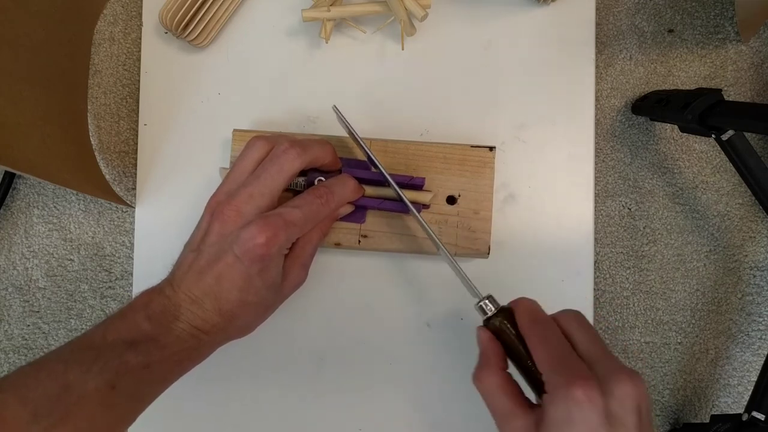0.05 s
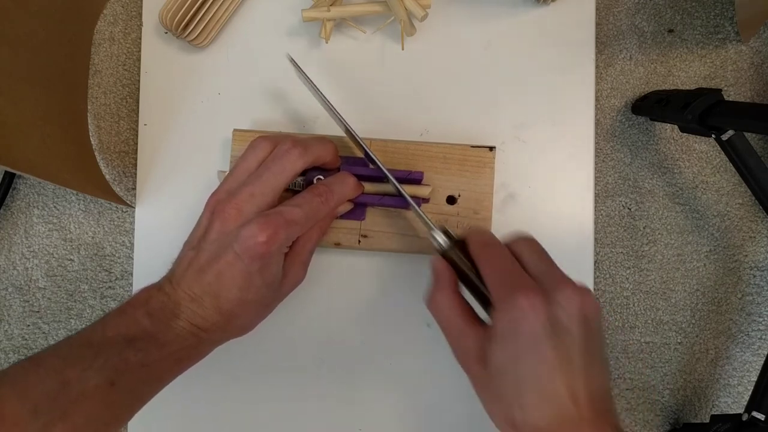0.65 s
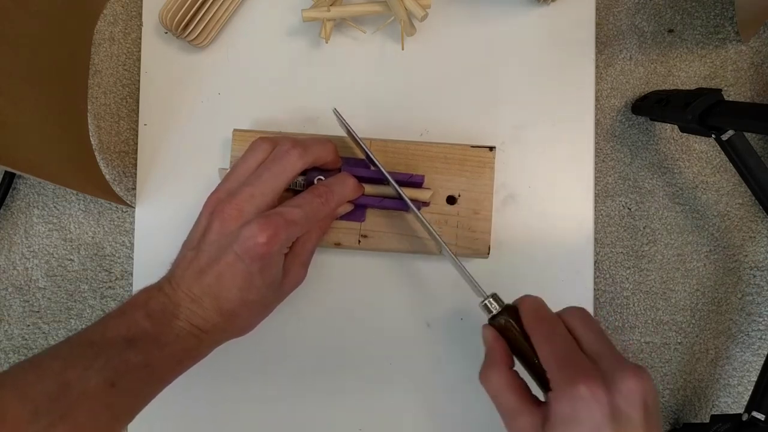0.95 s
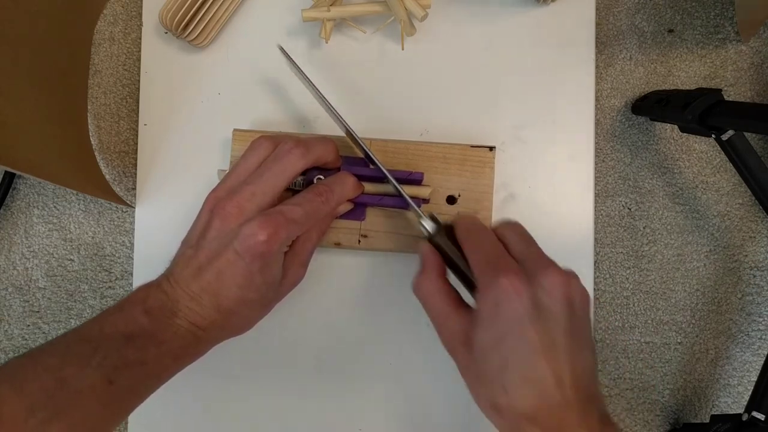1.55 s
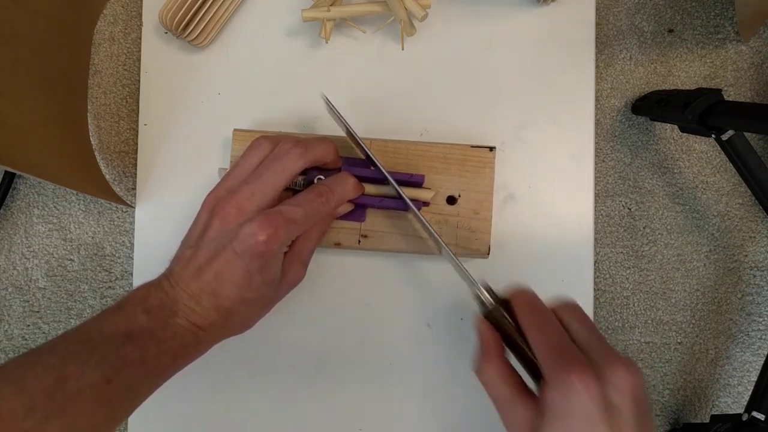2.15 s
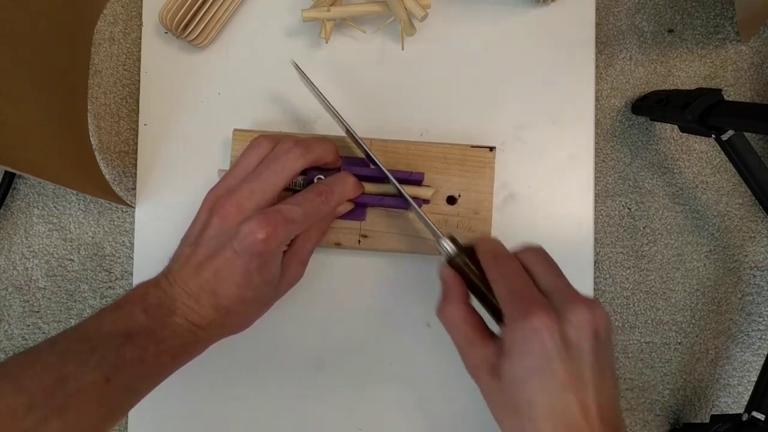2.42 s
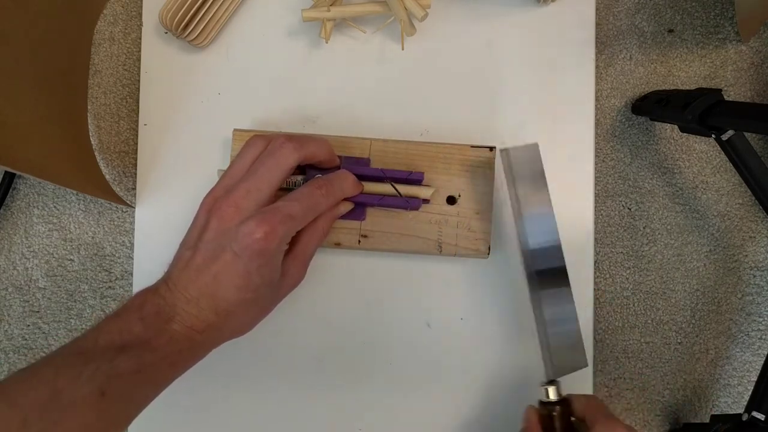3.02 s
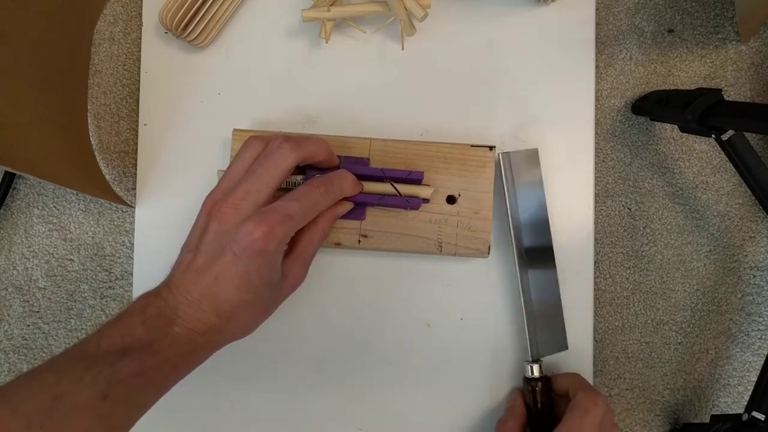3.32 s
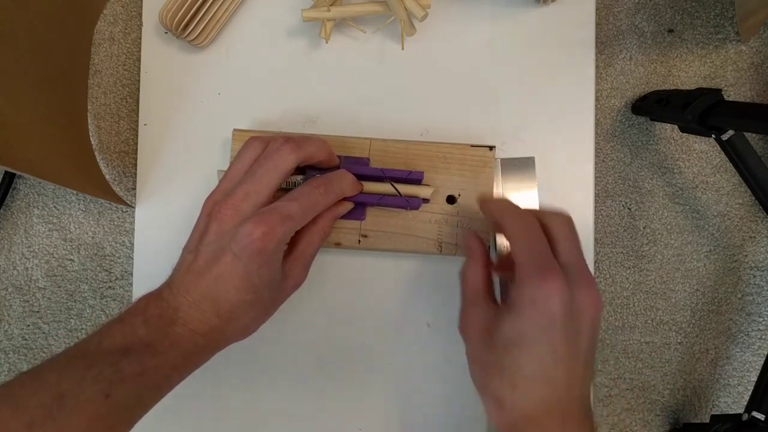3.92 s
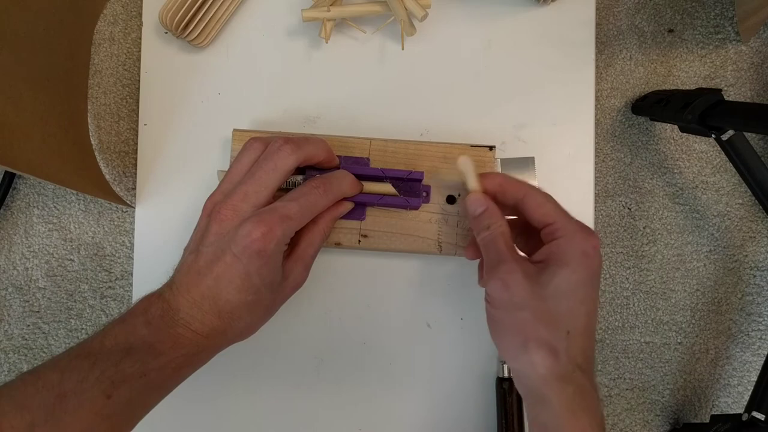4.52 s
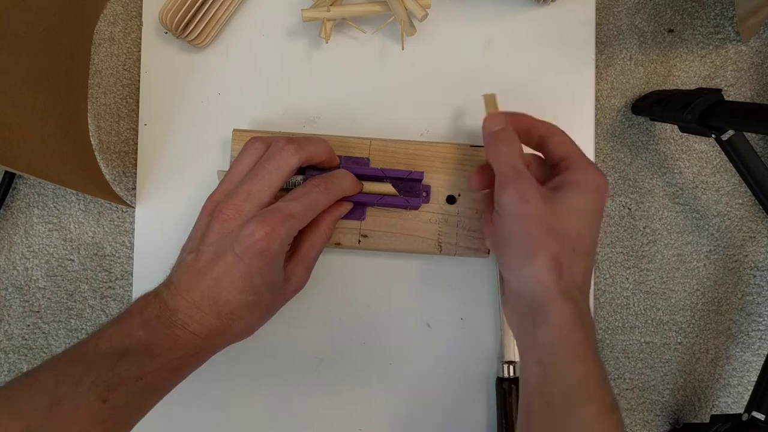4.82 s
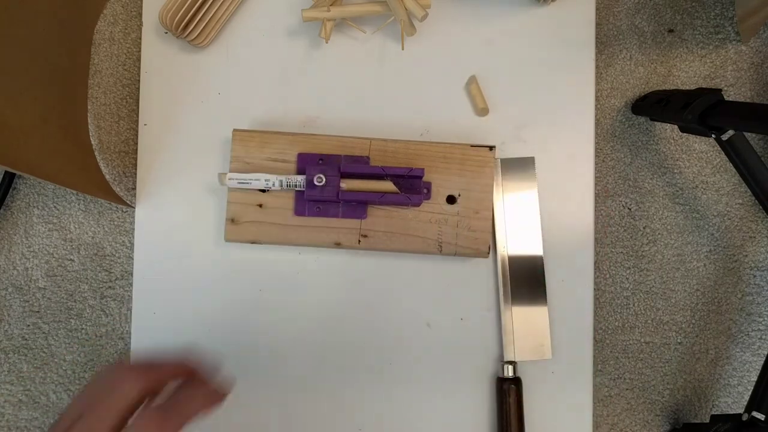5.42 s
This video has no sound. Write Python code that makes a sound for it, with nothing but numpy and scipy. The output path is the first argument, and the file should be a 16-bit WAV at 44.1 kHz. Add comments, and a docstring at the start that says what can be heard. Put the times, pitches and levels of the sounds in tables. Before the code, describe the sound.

Close by in a quiet little workshop, a handsaw goes rapidly back and forth through a wooden dowel, its fine teeth rasping and sometimes squealing while the board shudders. After about thirteen strokes the cut ends with a light metallic ring. The saw is laid down with a steel rattle, then the cut piece rubs free and taps onto the bench, followed by a faint brush of skin.

```python
"""A small, quiet workshop: a fine-toothed backsaw cuts a dowel in a plastic jig on a board.
In thirteen quick strokes each tooth tears fibres and nudges the board. The blade rings as it
leaves the cut and is laid clattering on the bench. Fingers slide the offcut out and drop it,
and the arm brushes away."""
import sys
import numpy as np
from scipy import signal
from scipy.fft import rfft, irfft
from scipy.io import wavfile
from scipy.ndimage import uniform_filter1d

SR = 44100
rng = np.random.default_rng(int(sys.argv[2]) if len(sys.argv) > 2 else 0)


def unload_wav(signal):
    """Save mono or channel-first audio to the path in sys.argv[1] as 16-bit WAV at rate SR, clipped to [-1, 1]."""
    wavfile.write(
        sys.argv[1],
        SR,
        np.round(np.clip(np.atleast_2d(signal).T, -1, 1) * 32767).astype(np.int16),
    )


N = 250047
TIME = np.arange(N) / SR
TAPS = 4096
FREQ = np.maximum(np.arange(TAPS // 2 + 1) * SR / TAPS, 1)
BREAKTHROUGH_S = 2.687


def undb(db):
    """Decibels to gain."""
    return np.exp(np.asarray(db) * (np.log(10) / 20))


def unit(x):
    """Scale to rms 1."""
    return x / np.sqrt(np.mean(x ** 2))


def shape(points, peaks=()):
    """Colour in dB over FREQ, plus resonances at most 9 dB high and at least f/25 wide."""
    hz, db = np.transpose(points)
    bumps = sum(min(gain_db, 9) / (1 + (2 * (FREQ - peak_hz) / max(width_hz, peak_hz / 25)) ** 2)
                for peak_hz, width_hz, gain_db in peaks)
    return np.interp(np.log(FREQ), np.log(hz), db) + bumps


def response(db):
    """Minimum-phase impulse response of a colour, unit energy."""
    cepstrum = irfft(np.log(undb(db)))
    cepstrum[1:TAPS // 2] *= 2
    cepstrum[TAPS // 2 + 1:] = 0
    h = irfft(np.exp(rfft(cepstrum)))
    return h / np.linalg.norm(h)


def ring(modes, max_t60_s=0.47):
    """Impulse response of decaying modes, unit energy; the hands damp the longest."""
    t = TIME[:SR]
    h = sum((-1) ** k * undb(db) * np.sin(2 * np.pi * hz * t) * 1000 ** (-t / min(t60_s, max_t60_s))
            for k, (hz, db, t60_s) in enumerate(modes))
    return h / np.linalg.norm(h)


def through(x, h):
    """Convolve with h, skipping silence at both ends."""
    out, sounding = np.zeros(N + len(h)), np.flatnonzero(x)
    if len(sounding):
        first, last = sounding[0], sounding[-1]
        out[first:last + len(h)] = signal.oaconvolve(x[first:last + 1], h)
    return out[:N]


def walk(rate_hz):
    """Smooth random drift, spread near 1."""
    steps = rng.standard_normal(8192)
    return np.interp(TIME * rate_hz, np.arange(len(steps)), steps)


def grains(rate_hz, scatter_db):
    """Tiny slips, random in time and size, rms 1."""
    slips = (rng.random(N) < rate_hz / SR) * rng.choice([-1, 1], N)
    return unit(slips * undb(scatter_db * rng.standard_normal(N)))


def burst(start_s, attack_s, hold_s, release_s):
    """Envelope: linear attack, hold, then -20 dB per release_s."""
    fading_s = np.maximum(TIME - start_s - attack_s - hold_s, 0)
    return np.clip((TIME - start_s) / attack_s, 0, 1) * undb(-20 * fading_s / release_s)


# Room tone: f/Hz, level/dB
AIR_COLOUR = [(15, -47), (25, -16), (58, 1), (76, -10), (114, -4.5), (134, -16.5), (236, -20.5),
              (344, -21.5), (754, -26.5), (3340, -32), (3620, -32.5), (6560, -33), (10400, -33.5),
              (13600, -31), (16000, -31.5)]


def room_tone(level_db=-60.5):
    """Steady low rumble and hiss."""
    air = unit(through(rng.standard_normal(N), response(shape(AIR_COLOUR))))
    return air * undb(level_db + .5 * walk(8))


# Pull and push in turn: t/s, length/s, slip time/s, rasp/dB, pressure rise/dB, board/dB,
# mid-stroke tooth rate/Hz, treble/dB, zip/dB, cut depth/0-1
SAW_STROKES = [(-0.055, 0.22, .015, -28, 0, -39, 640, -2.5, -14, 0.02),
               (0.159, 0.23, 0.0133, -28, 6.5, -40.5, 697, 1, -10, .02),
               (0.394, 0.21, 0.015, -27, 7.5, -39.5, 577.6, 1.5, -18, 0.05),
               (0.607, 0.25, 0.038, -28, -2.5, -41.5, 684.6, 2, -10.5, 0.01),
               (0.845, .23, 0.016, -28, 1, -40, 575, 0.5, -28, 0.07),
               (1.063, .224, 0.019, -28.5, -1.5, -39, 674.6, 2.5, -14, 0.27),
               (1.28, 0.21, 0.0175, -27, -1.5, -39.5, 573, 1, -26, 0.24),
               (1.482, 0.23, 0.024, -29.5, -6.5, -40, 703.7, 0.5, -9.5, 0.83),
               (1.703, .24, .033, -27.5, 1, -39.5, 658.6, 2.5, -22, .88),
               (1.917, .21, 0.018, -27, -11, -36, 688, 5.5, -18, 0.87),
               (2.119, 0.21, .016, -26, 0.5, -41.5, 692.4, 2, -31, 0.88),
               (2.329, 0.29, 0.015, -29.5, -2, -44.5, 512, -0.5, -18.5, .96),
               (2.559, .262, .029, -28.5, 0, -48, 549.6, -1, -12.5, 1)]


def hand_strokes(slip_db=-9.5, bite_s=0.0012, leave_s=0.018, board_ease_db=-15.5):
    """Teeth skate after each turn, then bite. Returns tooth rate, force per stroke, board shake."""
    rate_hz, shake = np.zeros((2, N))
    forces = np.zeros((len(SAW_STROKES), N))
    for force, row in zip(forces, SAW_STROKES):
        start_s, length_s, slip_s, rasp_db, press_db, board_db, tooth_hz = row[:7]
        during = (TIME > start_s) & (TIME < start_s + length_s)
        t = TIME[during]
        part = (t - start_s) / length_s
        speed = np.abs(np.sin(np.pi * part))
        bite = np.clip((t - start_s - slip_s) / bite_s, 0, 1)
        engaged = undb(slip_db * (1 - bite) - 20 * np.maximum(t - BREAKTHROUGH_S, 0) / leave_s)
        swell = speed ** np.where(part < .5, 0.55, 2.34)  # fast rise, early fade
        force[during] = swell * undb(rasp_db + press_db * (part - .5)) * engaged
        shake[during] += speed ** 0.56 * undb(board_db + board_ease_db * (part - .5)) * engaged
        rate_hz[during] = np.maximum(rate_hz[during], tooth_hz * speed ** .75)
    return rate_hz, forces, shake


def teeth(rate_hz, idle_hz=5, dowel_hz=2300):
    """Teeth jolt the dowel; many cut at once, so fibres tear in a dense stream."""
    phase = np.cumsum((rate_hz + idle_hz) * (1 + .06 * walk(250) + .03 * walk(35))) / SR
    tooth = phase.astype(int)
    size = undb(2.5 * rng.standard_normal(4096))[tooth]
    jolts = np.diff(tooth, prepend=0) * size * np.sqrt(SR / np.maximum(rate_hz, 200))
    zip_tone = .75 * np.sin(2 * np.pi * phase) * undb(4 * walk(130))
    for k in range(2, 8):  # overtones flare at the dowel's resonance
        flare = .22 + .7 / (1 + ((k * rate_hz - dowel_hz) / 450) ** 2)
        zip_tone += flare * np.sin(2 * np.pi * k * phase) * undb(3 * walk(130))
    fibres = grains(18000, 3.2) * undb(1.2 * walk(160))
    return jolts - uniform_filter1d(jolts, size=801), zip_tone, fibres


def shimmer(x, t60_s=0.025, share_db=-5):
    """The thin blade's close modes smear each snap."""
    tail = rng.standard_normal(TAPS) * undb(-60 * TIME[:TAPS] / t60_s)
    smear = through(x, tail / np.linalg.norm(tail))
    return (x + undb(share_db) * smear) / np.hypot(1, undb(share_db))


# Tearing wood: f/Hz, level/dB
RASP_COLOUR = [(410, -41.5), (700, -8.5), (800, -11), (1580, -9), (2190, -7), (2700, -2.5), (3200, -1),
               (4610, -5.5), (7200, -5), (15000, -5), (16000, -27)]
# Blade and dowel resonances: f/Hz, width/Hz, pull/dB, push/dB, deep cut/dB
KERF_PEAKS = [(1030, 40, 1, -2, -1), (1700, 120, 3.5, -3, -2), (2030, 160, 1, 2.5, 0),
              (2200, 240, 29, 28, 1.5), (2490, 120, -0.5, 9, -2), (2616, 120, -12, -16, -16),
              (3220, 280, -1.5, 3, 8), (3430, 190, -1, -2.5, -5.5), (4130, 370, 4.5, 7.5, 7),
              (4600, 270, -1, 3.5, -0.5), (6080, 270, 1.5, 1.5, 2.5), (7150, 300, 4, 6, 1.5),
              (7940, 260, 6, 9, -6), (8290, 950, 2, 7.5, 2.5), (9580, 1300, -2.5, -5, -3.5),
              (11950, 320, -1, -2, -6)]


def kerf_rasp(tearing, forces):
    """Tearing fibres excite the kerf; its tone shifts as the cut deepens."""
    rasp = 0
    for k, (force, (*_, treble_db, _, depth)) in enumerate(zip(forces, SAW_STROKES)):
        seating = 1 + .012 * rng.standard_normal(len(KERF_PEAKS))  # the blade sits anew each stroke
        peaks = [(hz * shift, width_hz, (1 - depth) * (push_db if k % 2 else pull_db) + depth * deep_db)
                 for shift, (hz, width_hz, pull_db, push_db, deep_db) in zip(seating, KERF_PEAKS)]
        tilt_db = treble_db * np.clip(np.log2(FREQ / 5000), -1, 2) / 2
        rasp += through(tearing * force, response(shape(RASP_COLOUR, peaks) + tilt_db))
    return shimmer(rasp)


# Board and bench top: f/Hz, level/dB, t60 before hand damping/s
BOARD_MODES = [(86.9, -18.5, 0.44), (93.6, -14.5, 0.75), (147.8, -11, 0.086), (231, -10.5, 0.084),
               (277.2, -2, 0.12), (312.7, -2, 0.1), (349, -0.5, 0.16), (388.5, -1, 0.13), (442, -3, 0.065),
               (557, -6.5, 0.08), (588, -7.5, 0.024), (664, -0.5, 0.049), (931, -9.5, 0.063)]
BENCH_MODES = [(83, -4.5, .45), (108.8, -5.5, 0.43), (162.2, -8.5, .15), (208, -2.5, 0.1)]
# Teeth catching: t/s, length/s, board/dB, bench/dB
TOOTH_CATCHES = [(0.0, 0.016, -44, -46), (0.032, 0.033, -40.5, -67), (0.405, 0.027, -49, -42.5),
                 (0.856, 0.034, -44, -40.5), (1.115, 0.023, -40, -55), (1.364, 0.026, -40, -64),
                 (1.735, 0.022, -37, -34), (2.137, 0.014, -40.5, -44), (2.574, 0.021, -52, -46)]


def board_rumble(jolts, fibres, shake, sway_db=-55):
    """Sawing shakes the board and sways the bench; catching teeth jerk both."""
    judder, rocking = 0, undb(sway_db) * (TIME < BREAKTHROUGH_S)
    for start_s, length_s, board_db, bench_db in TOOTH_CATCHES:
        catch = np.sin(np.pi * np.clip((TIME - start_s) / length_s, 0, 1))
        judder += undb(board_db) * catch
        rocking += undb(bench_db) * catch
    drive = undb(-6) * jolts + undb(-4) * fibres
    on_board = drive * (shake * undb(2 * walk(45.05)) + judder)
    return through(on_board, ring(BOARD_MODES)) + through(fibres * rocking, ring(BENCH_MODES))


# Free steel blade: f/Hz, level/dB, t60/s
BLADE_MODES = [(883, -17, .14), (1287, -3, .16), (1647, -19, .25), (3010, -19, .15), (4140, -14, .16),
               (4517, -18, .2), (5389, -14, .3), (6105, -20, .2), (7634, -23, .2), (8436, -25, .2),
               (10390, -25, .2)]


def sawing(jolt_db=-14, rasp_db=.5, blade_db=-14, dull_hz=4500, full_force_db=-32, free_s=0.039):
    """Teeth excite kerf, board and blade; the kerf damps the blade until it slips out."""
    rate_hz, forces, shake = hand_strokes()
    jolts, zip_tone, fibres = teeth(rate_hz)
    tearing = fibres + undb(jolt_db) * jolts
    bright = np.clip(sum(forces) / undb(full_force_db), 0, 1) ** .5  # slow, light teeth only rub
    rubbing = unit(signal.sosfilt(signal.butter(1, dull_hz, fs=SR, output="sos"), tearing))
    tearing = bright * tearing + (1 - bright) * rubbing
    rasp = undb(rasp_db) * kerf_rasp(tearing, forces)
    zips = zip_tone * sum(force * undb(zip_db) for force, (*_, zip_db, _) in zip(forces, SAW_STROKES))
    free = np.clip(1 + (TIME - BREAKTHROUGH_S) / free_s, 0, 1) ** 2
    blade = undb(blade_db) * through(tearing * sum(forces) * free, ring(BLADE_MODES))
    return rasp + zips + blade + board_rumble(jolts, fibres, shake)


def stick_slip(rows, overtone_db, roughness):
    """Brief rough friction tones that glide with sliding speed."""
    out = np.zeros(N)
    wobble = 1 + roughness * walk(500)
    for start_s, length_s, start_hz, end_hz, db in rows:
        during = (TIME > start_s) & (TIME < start_s + length_s)
        part = (TIME[during] - start_s) / length_s
        phase = 2 * np.pi * np.cumsum((start_hz + (end_hz - start_hz) * part) * wobble[during]) / SR
        tone = np.sin(phase) + undb(overtone_db) * np.sin(2 * phase)
        out[during] += undb(db) * np.sin(np.pi * part) * tone
    return out


# Squeals on wood: t/s, length/s, start f/Hz, end f/Hz, level/dB
WOOD_SQUEALS = [(0.24, 0.075, 2150, 2350, -34.5), (1.751, 0.054, 947.6, 1217, -53),
                (1.98, 0.059, 1094, 1554, -39), (2.47, 0.03, 1848, 2110, -49),
                (2.501, 0.029, 1020, 1140, -39.5), (2.625, 0.074, 904, 1122, -37.5),
                (4.362, 0.029, 2100, 2800, -52), (4.381, 0.029, 1496, 1744, -48),
                (4.388, .017, 3130, 3480, -38.5)]


def wood_squeals():
    """Blade or offcut sticks and slips against wood."""
    return stick_slip(WOOD_SQUEALS, overtone_db=-3.5, roughness=0.03)


def knocks(rows, body_db, click_db, thump_db, sway_db, contact_s, focus_oct, focus_db):
    """Short rattling contacts ring the struck body and thump board and bench."""
    clicks, pushes = np.zeros((2, N))
    for start_s, level_db, hz, board_db, treble_db in rows:
        contact = rng.standard_normal(TAPS) * np.exp(-TIME[:TAPS] / contact_s)
        contact[0] = 3
        bump_db = focus_db / (1 + (np.log2(FREQ / hz) / focus_oct) ** 2)
        tilt_db = (treble_db + 26.5) * np.clip(np.log2(FREQ / 3200), 0, 1) * 0.57
        # a blow that barely moves the board is thin in the lows
        thin_db = .5 * min(board_db - level_db + 23, 0) * np.clip(np.log2(1800 / FREQ), 0, 1.5)
        click = signal.fftconvolve(contact, response(body_db + bump_db + tilt_db + thin_db))[:TAPS]
        i = int(start_s * SR)
        clicks[i:i + TAPS] += undb(level_db + click_db) * click / np.linalg.norm(click)
        pushes[i] += undb(board_db)
    thump = through(pushes, ring(BOARD_MODES))
    sway = through(np.minimum(pushes, .012), ring(BENCH_MODES))  # firm blows sway the heavy bench alike
    return clicks + undb(thump_db) * thump + undb(sway_db) * sway


# Dowel and jig blows, relative levels: t/s, level/dB, centre f/Hz, board/dB, treble/dB
DOWEL_HITS = [(0.617, -29, 3880, -38, -27), (0.64, -22, 2070, -45, -6), (1.738, -14.5, 4000, -26.5, -12),
              (2.59, -16, 3530, -51, -16), (2.669, -9, 3300, -41, -26), (4.146, -46, 2200, -53, -19),
              (4.253, -20, 3350, -47.5, -11), (4.954, -19, 1800, -49, -43), (5.026, -14, 2060, -64, -15),
              (5.049, -27.5, 3910, -58, -18), (5.078, -33.5, 7650, -60, 0), (5.242, -26, 3100, -41, -21)]


def dowel_knocks():
    """The dowel knocks in the jig; the offcut clicks loose and drops."""
    wood_db = shape([(150, 10), (600, 11.5), (1500, 1), (3200, 1), (7000, -6), (16000, -14)],
                    peaks=[(1450, 510, 1.3), (2220, 200, 1), (2900, 490, 7.3), (4300, 1000, 7.3),
                           (6540, 590, 1.7)])
    return knocks(DOWEL_HITS, wood_db, click_db=10, thump_db=19.5, sway_db=21.5,
                  contact_s=0.0046, focus_oct=0.35, focus_db=10)


# Saw on bench, relative levels: t/s, level/dB, centre f/Hz, board/dB, treble/dB
SAW_HITS = [(2.946, -50, 4320, -81, -1), (3.077, -43.5, 4470, -53.5, -42), (3.224, -40, 1240, -33, -10),
            (3.326, -32.5, 4030, -59, -12), (3.352, -41, 1280, -49, -10),
            (3.632, -24.5, 1240, -41.5, -33.5), (3.656, -18, 3780, -53, -24),
            (3.666, -9.5, 3580, -22.5, -22), (3.674, -7.5, 1630, -26.5, -55), (3.717, -19, 3700, -33, -24),
            (3.736, -23, 2340, -35, -45), (3.758, -15.5, 3880, -44, -4), (3.8, -13.5, 3630, -37, -18),
            (3.823, -17.5, 3530, -69, -24), (3.86, -26, 4070, -55, 1)]


def blade_ring(twang_db=-9.5, knock_db=-7):
    """The blade is plucked at breakthrough and each time it meets the bench."""
    plucks = np.zeros(N)
    plucks[int(BREAKTHROUGH_S * SR)] = undb(twang_db)
    for start_s, level_db, *_ in SAW_HITS:
        plucks[int(start_s * SR)] += undb(level_db + knock_db)
    return through(plucks, ring(BLADE_MODES))


# Resonances of the blade against the bench: f/Hz, width/Hz, level/dB
LYING_PEAKS = [(702, 80, 9), (1450, 230, 4), (1970, 120, 3.5), (2470, 89, 7), (2930, 100, 13),
               (3410, 120, 11), (3770, 190, 7), (4040, 110, -1), (4120, 110, 3), (4450, 120, 1),
               (10850, 700, 12.5)]
# Blade struck, and its edge sliding: f/Hz, level/dB
STEEL_COLOUR = [(200, -9.5), (550, -5), (850, 3.5), (1500, 1), (2800, -7.5), (4500, -1), (5500, -12.5),
                (9000, -13.5), (12000, -18), (16000, -20.5)]
EDGE_COLOUR = [(300, -27), (900, -15.5), (1500, 1.5), (2500, -7), (3500, -2), (4200, 5.5), (5500, -7),
               (8000, -8), (10500, -3.5), (12500, -15), (16000, -12)]
# Steel on the board's edge: t/s, length/s, start f/Hz, end f/Hz, level/dB
STEEL_SQUEAKS = [(3.076, 0.028, 4500, 4400, -68), (3.124, .044, 4460, 4060, -51.5),
                 (3.166, 0.03, 4300, 4360, -62)]
# Chatter as the blade, then the handle, comes down: t/s, hold/s, release/s, level/dB
BLADE_CHATTERS = [(3.682, 0.062, 0.093, -38.5), (3.8, 0.037, 0.039, -36)]


def laying_down(slide_s=3.59, flat_s=3.672):
    """The blade knocks, squeaks, slides on its edge, drops flat and chatters to rest."""
    steel_db = shape(STEEL_COLOUR, LYING_PEAKS)
    sliding = undb(-35) * burst(slide_s, attack_s=.008, hold_s=.042, release_s=.04)
    slide = through(grains(11000, 2.3) * sliding, response(shape(EDGE_COLOUR, LYING_PEAKS)))
    rattle = grains(2000, 4) * undb(2.5 * walk(110))
    rocking = sum(undb(db) * burst(start_s, 0.014, hold_s, release_s)
                  for start_s, hold_s, release_s, db in BLADE_CHATTERS)
    chatter = through(rattle * rocking, response(steel_db - 8 * np.clip(np.log2(FREQ / 4500), 0, 1)))
    landing = undb(-38) * burst(flat_s, attack_s=0.0055, hold_s=0.062, release_s=0.17)
    board = through(rattle * landing, ring(BOARD_MODES))
    squeaks = stick_slip(STEEL_SQUEAKS, overtone_db=-23, roughness=0.024)
    hits = knocks(SAW_HITS, steel_db, click_db=13.5, thump_db=20.5, sway_db=25.5,
                  contact_s=0.0062, focus_oct=0.19, focus_db=14)
    return hits + squeaks + slide + chatter + board


# Rubs on the jig: peak t/s, 20 dB rise/s, 20 dB fall/s, level/dB, centre f/Hz, board/dB
JIG_RUBS = [(4.14, 0.15, .07, -68.5, 2000, -59.5), (4.268, 0.1, 0.058, -56.5, 2980, -64),
            (4.315, 0.04, 0.054, -60, 1800, -51.5), (4.355, 0.037, .05, -53.5, 2280, -62),
            (4.397, 0.048, 0.0084, -39, 2980, -69), (4.78, 0.063, 0.046, -72, 4500, -84),
            (5.224, 0.026, 0.036, -51, 5000, -56)]


def offcut_rubs():
    """Fingers and offcut rub on the jig; the friction also shakes the board."""
    friction = grains(6000, 3) * undb(1.5 * walk(120))
    slide, on_board = 0, 0
    for peak_s, rise_s, fall_s, db, hz, board_db in JIG_RUBS:
        rub = friction * undb(-20 * np.maximum((peak_s - TIME) / rise_s, (TIME - peak_s) / fall_s))
        colour_db = shape([(100, -13.5), (900, -3.5), (1500, 3), (7000, -2.5), (16000, -7)],
                          peaks=[(hz, hz / 2, 9), (6900, 280, 8)])
        slide += undb(db) * through(rub, response(colour_db))
        on_board += undb(board_db) * rub
    return slide + through(on_board, ring(BOARD_MODES))


# Skin on the bench: f/Hz, level/dB
SKIN_COLOUR = [(240, -42), (400, -2.5), (520, -12), (1140, -3.5), (1510, -11), (1930, -6.5), (3530, -4.5),
               (16000, -7.5)]


def arm_brush(start_s=5.275, level_db=-55.5):
    """The arm brushes off the bench with a fading hiss."""
    envelope = undb(level_db + 0.92 * walk(30)) * burst(start_s, attack_s=0.046, hold_s=0, release_s=1.3)
    return through(rng.standard_normal(N) * envelope, response(shape(SKIN_COLOUR)))


def room(x, wet_db=-15, t60_low_s=0.31, t60_high_s=0.17):
    """Reflections of a small furnished room; treble dies first."""
    t = TIME[:SR // 2]
    noise = rng.standard_normal(len(t))
    low = signal.sosfilt(signal.butter(1, 3000, fs=SR, output="sos"), noise)
    tail = low * undb(-60 * t / t60_low_s) + 0.87 * (noise - low) * undb(-60 * t / t60_high_s)
    tail *= np.clip((t - .003) / 0.01, 0, 1)
    return x + undb(wet_db) * through(x, tail / np.linalg.norm(tail))


def scene():
    """Saw, bench and hands over room tone, mono."""
    air = room_tone()
    saw = sawing() + wood_squeals() + blade_ring() + laying_down()
    handling = offcut_rubs() + arm_brush() + dowel_knocks()
    return (room(saw + handling) + air)[None]


def record(dry, low_hz=42, top_hz=15900):
    """Thin the deepest bass and cut the top."""
    dry = signal.sosfilt(signal.butter(3, low_hz, "highpass", fs=SR, output="sos"), dry)
    return signal.sosfilt(signal.ellip(10, .1, 80, top_hz, fs=SR, output="sos"), dry)


dry = scene()
out = record(dry)
unload_wav(out)
```